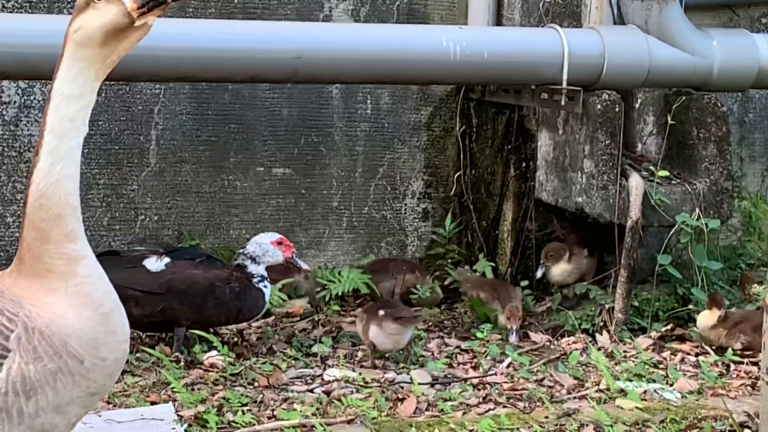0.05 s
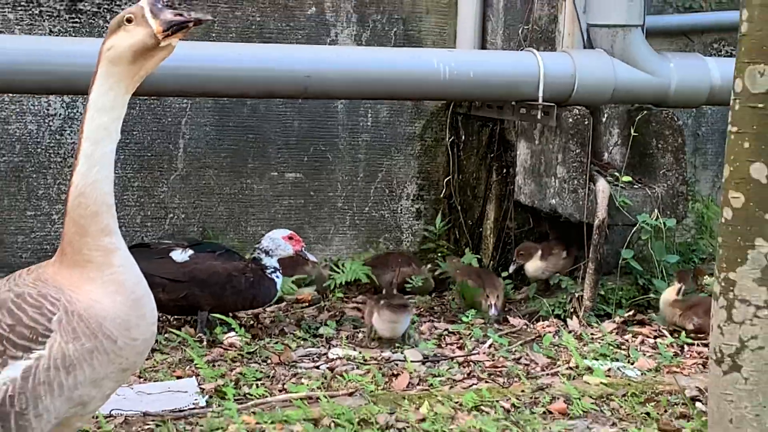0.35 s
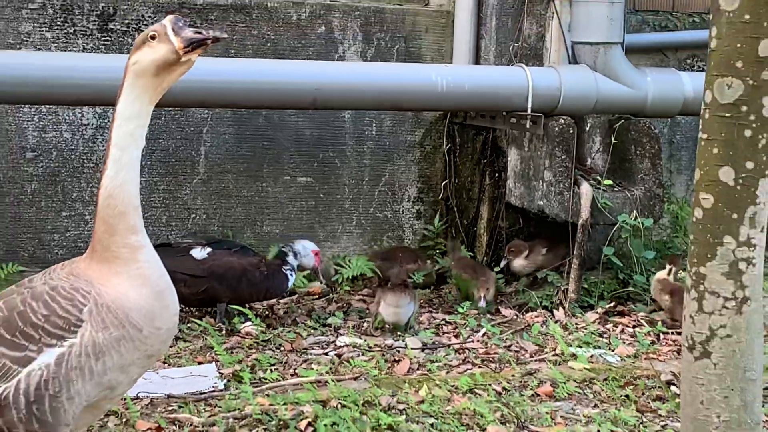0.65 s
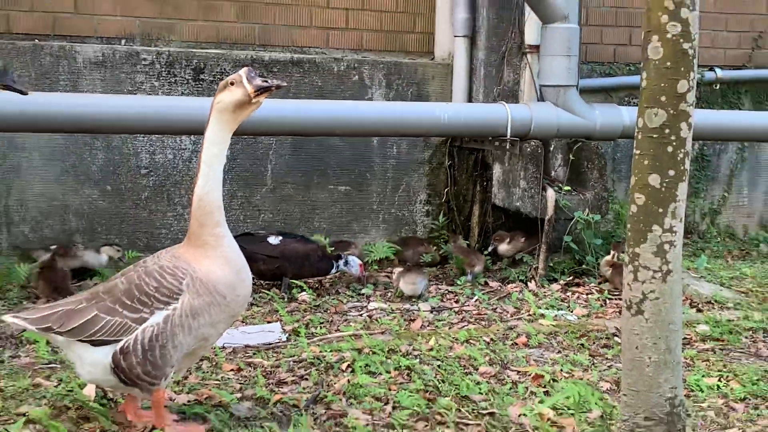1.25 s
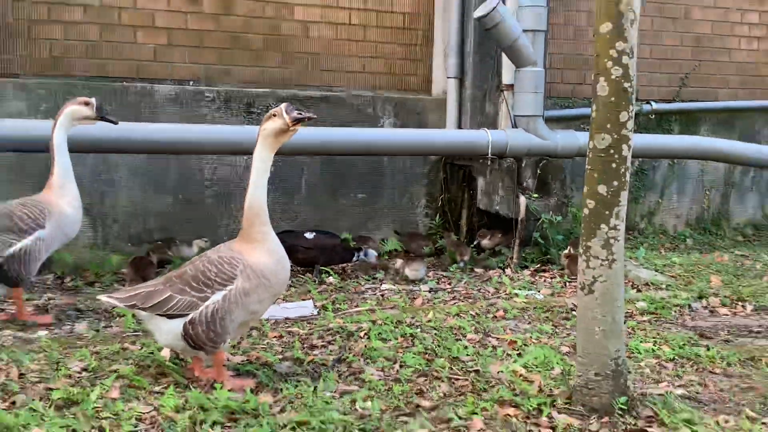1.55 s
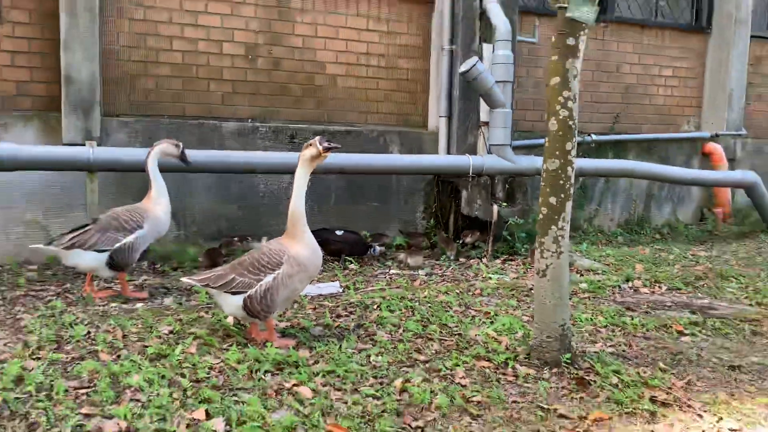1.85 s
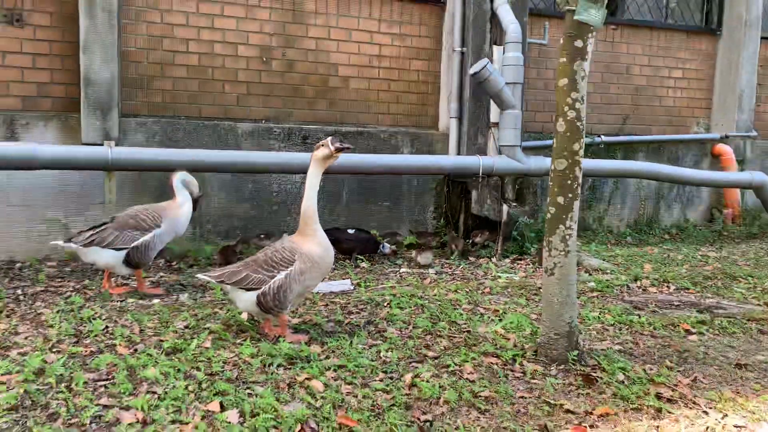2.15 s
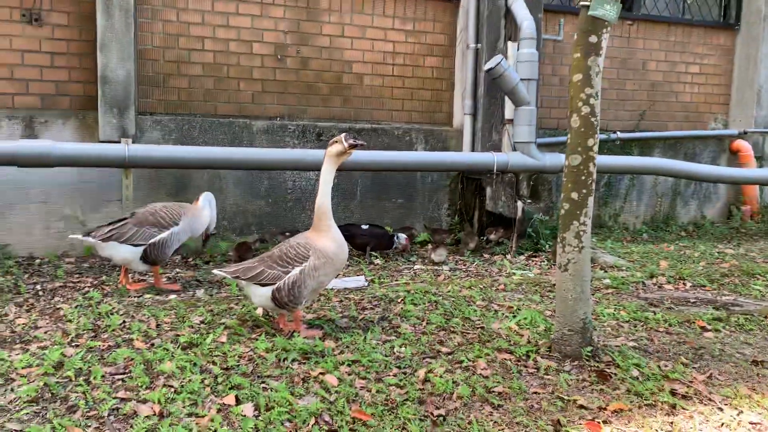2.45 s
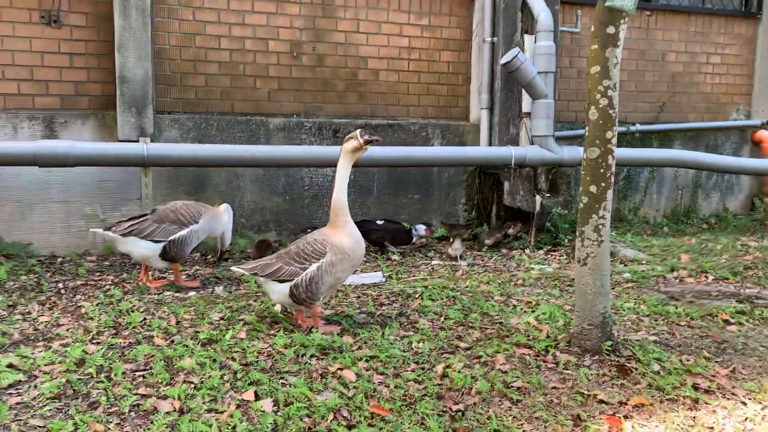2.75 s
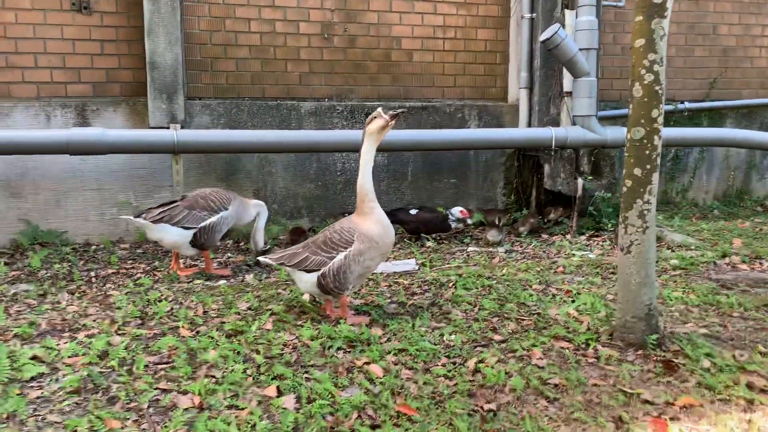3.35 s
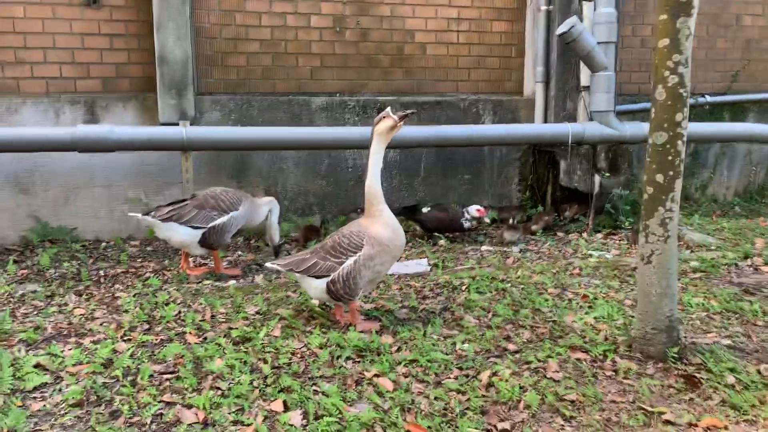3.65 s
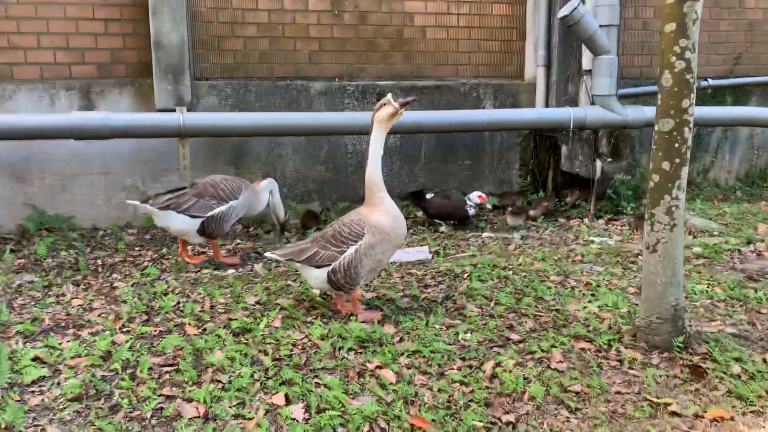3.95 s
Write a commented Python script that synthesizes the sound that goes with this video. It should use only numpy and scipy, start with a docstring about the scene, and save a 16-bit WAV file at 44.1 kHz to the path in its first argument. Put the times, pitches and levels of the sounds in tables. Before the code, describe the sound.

A goose gives one soft, breathy hiss near the microphone, about halfway through. Ducklings peep faintly by a wall over a low town rumble and a distant engine. Twigs tick and dry leaves rustle toward the end.

```python
"""A goose gives one soft hiss, air rushing through its open bill, near the microphone on grass by a wall.
Ducklings peep in short, raspy whistles at the foot of the wall. Twigs and dry leaves tick, the litter
rustles, and a soft footfall lands at the end. Far off, a bird twitters over a town's rumble, an engine
that swells and fades, and the hum of a fan. Moving air bumps the microphone's two ports."""
import sys
import numpy as np
from scipy import signal
from scipy.fft import rfft, irfft, next_fast_len
from scipy.io import wavfile
from scipy.ndimage import uniform_filter1d, map_coordinates

SR = 44100
rng = np.random.default_rng(int(sys.argv[2]) if len(sys.argv) > 2 else 0)


def persist_wave(psi):
    """Save psi, clipped to +-1, as 16-bit WAV."""
    counts = np.round(np.clip(psi, -1, 1) * 32767).astype(np.int16)
    wavfile.write(sys.argv[1], SR, np.atleast_2d(counts).T)


N = 176400

# likeness of the surrounding sound at the two microphone ports: (frequency [Hz], coherence [0-1])
PORT_COHERENCE = [(40, 0.17), (120, 0.85), (400, 0.38), (800, 0.24), (1400, 0.077), (2500, 0.032),
                  (3800, 0.24), (6500, 0.38), (8500, 1), (15000, 1)]


def goose(widest_s=2.09, sag=.65, echo_gain=.42):
    """Close by, air hisses through the bill, whose resonances rise and sink as it opens and closes."""
    # effort of the breath: (time [s], level [dB])
    breath = [(1.66, -80), (1.70, -52), (1.8, -50), (1.915, -47), (1.937, -42.5), (1.965, -45),
              (2.01, -43.5), (2.07, -42.5), (2.11, -43), (2.165, -48), (2.3, -51), (2.45, -54), (2.56, -73)]
    # colour of the open bill: (frequency [Hz], relative level [dB])
    bill_colour = [(200, -50), (450, -43), (750, -12.5), (950, -3.5), (1300, -2.5), (1750, -17.5),
                   (2300, -9.5), (2900, -7.5), (3350, -22), (4200, -16.5), (5500, -26), (9000, -22),
                   (15000, -60)]
    # narrow resonances of the bill: (frequency when wide open [Hz], level against the hiss [dB])
    bill_resonances = [(930, -8), (1320, -6)]
    t = np.arange(N) / SR
    tuning = 1 - sag * np.minimum((t - widest_s) ** 2, 1)
    phase_per_hz = 2 * np.pi * np.cumsum(tuning) / SR
    rings = np.zeros(N)
    for hz, db in bill_resonances:
        turbulence = wobble(130) + 1j * wobble(130)
        rings += amp(db) * unit(np.real(turbulence * np.exp(1j * hz * phase_per_hz)))
    hissing = (t > breath[0][0]) & (t < breath[-1][0])
    effort = amp(curve(breath) + 2 * wobble(44.97)) * hissing
    jet = effort * stereo_noise(bill_colour, coherence=[(1000, .93), (5000, 1)])
    delay_s = .002365 * (1 - .1 * (t - 2))  # the ground echo shortens as the microphone backs away
    ground_echo = np.array([np.interp(t - delay_s, t, side) for side in jet])
    return jet + effort * rings + echo_gain * ground_echo


def peep(length_s, hz, rise, fall, rasp, arch=.04, waver_hz=700):
    """One arched, raspy whistle; fall drops its pitch as the bill closes."""
    u = np.linspace(-.5, .5, max(int(length_s * SR), 8))  # 0 is the middle of the note
    waver = map_coordinates(rng.standard_normal(200), [np.arange(len(u)) * waver_hz / SR])
    closing = np.clip(u / .5, 0, 1) ** 4
    pitch = hz * (1 + rise * u - arch * (2 * u) ** 2 - fall * closing + rasp * waver)
    envelope = np.sqrt(2 * np.abs(np.cos(np.pi * u)))
    return envelope * np.sin(2 * np.pi * np.cumsum(pitch) / SR)


def ducklings_and_far_bird(far_bird_db=-60.5, wall_db=-2.5):
    """Ducklings whistle at the foot of the wall; a far bird twitters in short, faint notes."""
    # duckling calls: (time [s], length [s], pitch [Hz], level [dB],
    # rise [share of pitch], closing fall [share of pitch], rasp [share of pitch])
    peeps = [(-.02, .085, 3930, -49, .03, .08, .021), (.46, .075, 3300, -51.5, .08, .22, .04),
             (.995, .04, 4750, -60.5, -.2, 0, .05), (1.038, .078, 3820, -48.5, 0, .27, .04),
             (1.477, .06, 3260, -50.5, .12, .16, .035), (1.95, .11, 4030, -52.5, -.16, 0, .065),
             (2.335, .078, 3130, -51, -.17, 0, .05), (2.40, .04, 3720, -57, .04, 0, .055),
             (2.67, .023, 4000, -57, -.06, .1, .06), (2.75, .04, 3980, -58.5, .05, 0, .055),
             (2.975, .095, 4280, -52.3, 0, 0, .062), (3.248, .028, 5200, -54, .02, 0, .045),
             (3.435, .045, 7340, -52, -.08, .13, .065)]
    # the far bird's notes: (time [s], pitch [Hz], rise [share of pitch])
    twitter = [(.905, 2680, 0), (.952, 2680, .06), (1.055, 2670, -.02), (1.092, 2790, .14),
               (1.17, 2690, .04), (1.225, 2950, .04), (1.278, 2680, .07), (1.375, 2660, .04),
               (1.418, 2870, .12)]
    calls = np.zeros(N)
    for s, length_s, hz, db, rise, fall, rasp in peeps:
        add(calls, s, amp(db) * peep(length_s, hz, rise, fall, rasp))
    for s, hz, rise in twitter:
        add(calls, s, amp(far_bird_db) * peep(length_s=.042, hz=hz, rise=rise, fall=0, rasp=.015))
    return calls + amp(wall_db) * wall(calls)


def twig_ticks(ring_t60_s=.0066, crack_t60_s=.01, ring_band_hz=(750, 2200), wall_db=-8.5):
    """Nearby twigs and dry leaves tick: a few cycles of a dull ring and a brighter crack."""
    # ticks: (time [s], relative level [dB], ring pitch [Hz], crack offset [dB])
    ticks = [(.256, -38.5, 1500, -19), (0.562, -28.5, 1090, -12), (.566, -41, 1800, -24),
             (1.136, -38, 1100, -26), (1.612, -36, 1110, -20), (1.639, -38, 1220, -24),
             (1.696, -34, 970, -25), (2.643, -50.5, 4120, 17), (3.192, -38.5, 6500, 4.5),
             (3.357, -31, 1420, -24), (3.4058, -24.5, 1130, -37), (3.417, -38, 1300, -24),
             (3.485, -32, 1820, -2), (3.49, -37, 1240, -23), (3.508, -32, 1140, -21),
             (3.647, -39.5, 3040, 12), (3.654, -30.5, 1780, 3), (3.665, -36, 1240, -26),
             (3.742, -38, 2030, 6.5), (3.768, -39.5, 1210, -24), (3.876, -38.5, 1193, -15),
             (3.964, -27, 1610, -13)]
    # brightness of a crack: (frequency [Hz], gain [dB])
    crack_colour = [(500, 0), (4000, 0), (7000, -2), (15000, -5)]
    rings, cracks = np.zeros((2, N))
    t = np.arange(SR // 20) / SR
    ring_envelope = amp(-60 * t / ring_t60_s) * (1 - np.exp(-t / .00012))
    for s, db, hz, crack_db in ticks:
        modes = np.sin(2 * np.pi * hz * t) + .35 * np.sin(2 * np.pi * 1.41 * hz * t)
        add(rings, s, amp(db + 5) * modes * ring_envelope)
        add(cracks, s, rng.standard_normal(len(t)) * amp(db + crack_db - 60 * t / crack_t60_s))
    band = signal.butter(2, ring_band_hz, "bandpass", fs=SR, output="sos")
    direct = signal.sosfilt(band, rings) + filtered(cracks, lambda hz: amp(along(crack_colour, hz)))
    return direct + amp(wall_db) * wall(direct)


def leaf_litter(grain_db=2.5):
    """Leaves on the ground give a grainy rustle."""
    # strength of the rustle: (time [s], level [dB])
    rustle = [(0, -53), (1.2, -77), (1.3, -49.5), (1.4, -59.5), (1.65, -50.5), (2.2, -63), (3.1, -53.5),
              (3.47, -52.5), (3.6, -51.5), (3.82, -57), (3.89, -47), (3.96, -40.5), (4, -43.5)]
    # colour of the leaves: (frequency [Hz], relative level [dB])
    leaf_colour = [(300, 6), (700, 4.5), (1700, -0.5), (3000, -2), (4200, -1), (6000, -4.5), (9000, -3.5),
                   (15000, -13.5)]
    grain = unit(amp(grain_db * wobble(350)))
    return amp(curve(rustle)) * grain * stereo_noise(leaf_colour, PORT_COHERENCE)


def footfall(middle_s=3.975, spread_s=.05, level_db=-35):
    """A foot thuds on soft ground, under the last rustle."""
    # colour of the thud: (frequency [Hz], relative level [dB])
    thud_colour = [(30, -10), (70, 0), (200, 0), (500, -13), (1000, -35)]
    t = np.arange(N) / SR
    envelope = np.exp(-((t - middle_s) / spread_s) ** 2)
    return amp(level_db) * envelope * stereo_noise(thud_colour, PORT_COHERENCE)


def wind_buffet():
    """Moving air bumps against the microphone, differently at each port."""
    # strength of the buffeting: (time [s], level [dB])
    gusts = [(0, -44), (.3, -39.5), (.6, -50), (1.2, -51), (1.35, -40), (1.6, -50), (2.1, -36.5),
             (2.4, -36.5), (2.7, -47), (3.1, -40), (3.8, -44), (3.95, -31), (4, -31)]
    # its low colour: (frequency [Hz], relative level [dB])
    gust_colour = [(20, -24), (35, -8), (60, 7.5), (130, 4), (250, -16), (600, -57)]
    return amp(curve(gusts)) * stereo_noise(gust_colour, coherence=[(80, .24)])


def engine(octave_db=-19, flutter_db=1, rough_db=-10):
    """A distant engine swells and fades: a low drone with a weak octave and a rough rumble."""
    # swells of the engine: (time [s], level [dB])
    swells = [(0, -66), (.45, -37), (.8, -54), (1.22, -65), (1.33, -33.5), (1.6, -69), (1.85, -39.5),
              (2.15, -32.5), (2.36, -28.5), (2.6, -32.5), (2.76, -60), (2.98, -28), (3.18, -37),
              (3.33, -29.5), (3.56, -28.5), (3.73, -43), (3.84, -34), (4, -27.5)]
    # its drone: (time [s], pitch [Hz])
    pitch = [(0, 86.1), (2.4, 86.78), (3.0, 84.58), (3.4, 84), (4, 84)]
    # its rumble: (frequency [Hz], relative level [dB])
    rumble_colour = [(40, 1), (65, 25.5), (86, 5), (110, 8), (180, -1.5), (400, -67)]
    phase = 2 * np.pi * np.cumsum(curve(pitch)) / SR
    drone = np.sqrt(2) * (np.sin(phase) + amp(octave_db) * np.sin(2 * phase))
    drone *= amp(flutter_db * wobble(25))
    rumble = stereo_noise(rumble_colour, coherence=[(80, .56)])
    return amp(curve(swells)) * (drone + amp(rough_db) * rumble)


def fan(flutter_db=3.3, fade_db_per_s=.8):
    """A fan hums in fluttering tones, fainter as the microphone backs away."""
    # tones of the fan: (frequency [Hz], level at 3 s [dB], flutter rate [Hz])
    tones = [(361.2, -52, 13), (379.6, -55, 48), (743.4, -62, 25)]
    t = np.arange(N) / SR
    hum = np.zeros(N)
    for hz, db, flutter_hz in tones:
        tone = np.sin(2 * np.pi * hz * t + wobble(flutter_hz))
        hum += amp(db) * unit(tone * amp(flutter_db * wobble(flutter_hz)))
    return hum * amp(-fade_db_per_s * (t - 3))


def town_air(rumble_db=-37.5, drift_db=.25, fizz_db=-57):
    """The town rumbles in the distance under a faint, high fizz."""
    # colour of the town: (frequency [Hz], relative level [dB])
    town_colour = [(15, -44), (25, -17), (52, -1.5), (91, 0), (143, -8), (240, -9.5), (327, -14),
                   (359, -14.5), (575, -24), (728, -19), (900, -26), (2050, -32), (2600, -33),
                   (3140, -34.5), (7000, -39), (9100, -75), (15400, -120)]
    # colour of the fizz: (frequency [Hz], relative level [dB])
    fizz_colour = [(4000, -33), (6500, -1), (7700, -80), (8700, 6.5), (11000, 1), (13500, 2), (15700, -6)]
    rumble = amp(rumble_db + drift_db * wobble(6)) * stereo_noise(town_colour, PORT_COHERENCE)
    fizz = amp(fizz_db) * stereo_noise(fizz_colour, PORT_COHERENCE)
    return patchy(rumble + fizz, depth_db=2.65)


def wall(x, t60_s=.3):
    """The wall and yard answer with a short, diffuse stereo tail."""
    t = np.arange(SR // 2) / SR
    tail = rng.standard_normal((2, len(t))) * amp(-60 * t / t60_s) * (1 - np.exp(-t / .0009))
    return signal.fftconvolve(x[None], tail / np.linalg.norm(tail[0]), axes=1)[:, :N]


def microphone_ports(x):
    """Sound reaches the microphone's two ports out of phase."""
    # lead of the left port over the right: (frequency [Hz], phase [rad])
    left_lead = [(50, 0), (300, -.3), (650, -.8), (1800, .2), (3000, -1.5), (3800, 0), (5300, -1.6),
                 (6500, 0), (7300, 1.3), (8000, 3), (8900, 3.3), (10500, 6.1), (11500, 6.4), (12800, 9.2),
                 (14000, 9.6), (15000, 12.4)]
    return filtered(x, lambda hz: np.exp(.5j * along(left_lead, hz) * np.array([[1], [-1]])))


def stereo_noise(colour, coherence):
    """Coloured noise of rms 1, as alike in both channels as the (Hz, coherence) points say."""
    def mid_side_gains(hz):
        angle = np.arccos(np.clip(along(coherence, hz), -1, 1)) / 2
        return amp(along(colour, hz)) * [np.cos(angle), np.sin(angle)]
    mid, side = filtered(rng.standard_normal((2, N)), mid_side_gains)
    return unit(np.array([mid + side, mid - side]))


def patchy(x, depth_db):
    """Slow random patches of gain over time and frequency."""
    spectra = signal.stft(x, nperseg=2048)[2]
    patches = uniform_filter1d(rng.standard_normal(spectra.shape[1:]), size=4, axis=0)
    patches = uniform_filter1d(patches, size=8, axis=1)
    return signal.istft(spectra * amp(depth_db * unit(patches)), nperseg=2048)[1][:, :N]


def amp(db):
    """Decibels to gain."""
    return 10 ** (np.asarray(db) / 20)


def unit(x):
    """Scale to rms 1."""
    return x / np.sqrt(np.mean(x ** 2) + 1e-20)


def along(points, hz):
    """Interpolate (Hz, value) points on a log frequency axis."""
    knots_hz, values = np.transpose(points)
    return np.interp(np.log(hz + 1), np.log(knots_hz + 1), values)


def curve(points):
    """(s, value) points as one value per sample."""
    return np.interp(np.arange(N) / SR, *np.transpose(points))


def wobble(rate):
    """A smooth random curve, rate knots a second."""
    return map_coordinates(rng.standard_normal(int(N * rate / SR) + 4), [np.arange(N) * rate / SR])


def filtered(x, response):
    """Filter x by a complex response, given as a function of Hz."""
    size = next_fast_len(N + SR // 2)
    return irfft(rfft(x, size) * response(np.fft.rfftfreq(size, 1 / SR)), size)[..., :N]


def add(track, s, sound):
    """Mix a sound into a track at time s."""
    at = round(s * SR) + np.arange(len(sound))
    inside = (at >= 0) & (at < N)
    track[at[inside]] += sound[inside]


def scene(pan_db=.55):
    """From the microphone, birds and twigs sit slightly to the right of the background."""
    birds_and_twigs = (goose() + twig_ticks() + ducklings_and_far_bird()) * amp([[-pan_db], [pan_db]])
    background = town_air() + engine() + fan() + leaf_litter() + wind_buffet() + footfall()
    return microphone_ports(birds_and_twigs + background)


def record(dry, top_hz=15800):
    """The recorder keeps nothing above its band limit."""
    return filtered(dry, lambda hz: hz < top_hz)


dry = scene()
out = record(dry)
persist_wave(out)
```